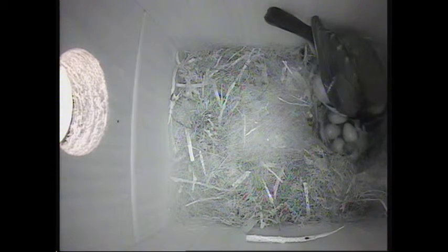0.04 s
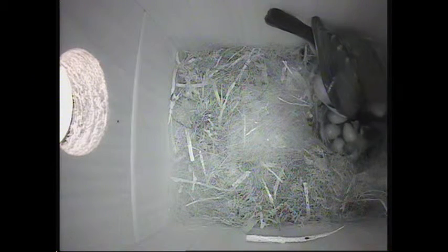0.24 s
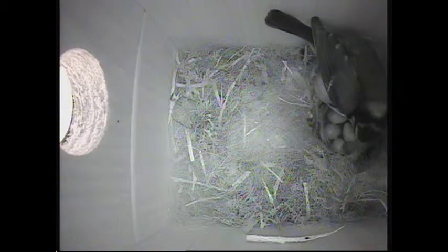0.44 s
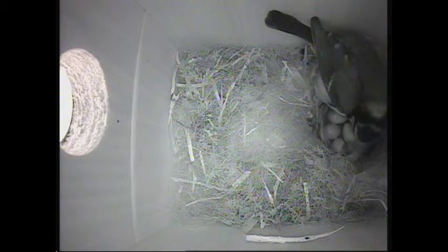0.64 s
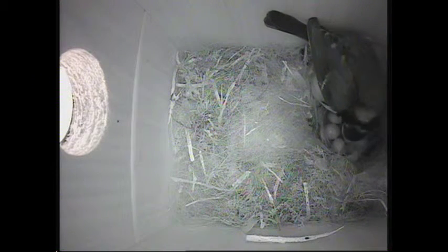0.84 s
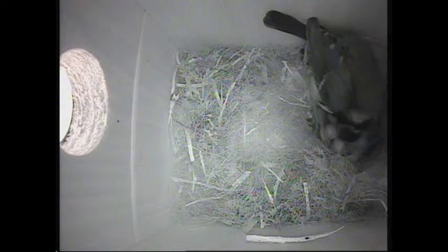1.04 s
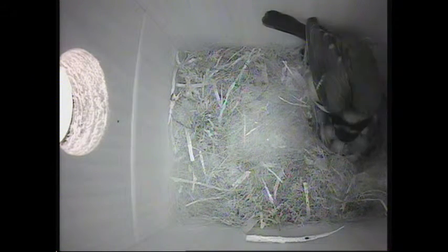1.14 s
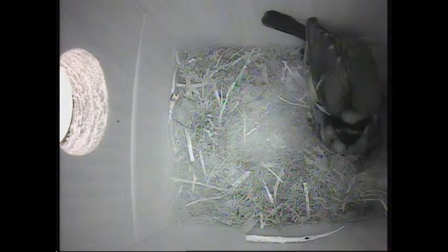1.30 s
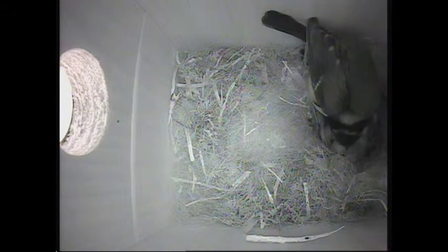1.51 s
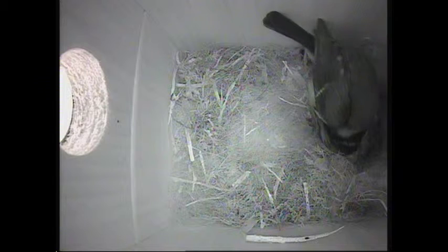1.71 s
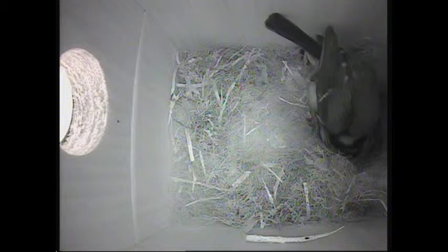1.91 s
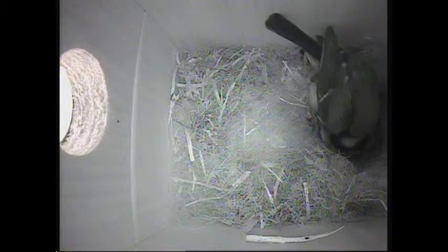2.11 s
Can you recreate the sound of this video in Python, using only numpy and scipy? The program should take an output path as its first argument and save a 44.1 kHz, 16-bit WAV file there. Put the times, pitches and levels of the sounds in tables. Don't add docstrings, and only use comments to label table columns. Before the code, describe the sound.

A tit scolds harshly inside a small wooden nest box: six short, dry, breathy rasps in quick succession from about 0.2 to 0.6 seconds, loud and close. Before it, a fluttering whistle falls and fades. From 0.6 seconds to the end, faint distant birds warble with thin metallic overtones. Constant low electrical buzz, rumble, hiss and slight bedding rustle lie underneath, almost entirely in the left channel.

```python
import sys
import numpy as np
from scipy import signal
from scipy.fft import rfft, irfft, next_fast_len
from scipy.io import wavfile
from scipy.ndimage import uniform_filter1d

SR = 44100
rng = np.random.default_rng(int(sys.argv[2]) if len(sys.argv) > 2 else 0)


def makeup_ratio(level_db):
    decades = np.asarray(level_db, float) / 20
    return 10 ** decades


def wav_record(signal):
    frames = np.transpose(np.atleast_2d(signal))
    bounded = np.clip(frames, -1, 1)
    quanta = np.round(bounded * 32767).astype(np.int16)
    wavfile.write(sys.argv[1], SR, quanta)


N = 94815
TIME_S = np.arange(N) / SR
LINE_HZ, FRAME_S = 15625, 1 / 50


def evened(x):
    return x / np.sqrt(np.mean(x ** 2) + 1e-20)


def coloured(x, points):
    f, db = np.transpose(points)
    hz = np.fft.rfftfreq(len(x), 1 / SR)
    gain = makeup_ratio(np.interp(np.log(hz + 1), np.log(f), db))
    return irfft(rfft(x) * gain, len(x))


def resonate(x, hz, width):
    turn = np.exp(2j * np.pi * np.cumsum(hz * np.ones(len(x))) / SR)
    r = np.exp(-np.pi * width / SR)
    return 2 * (turn * signal.lfilter([1 - r], [1, -r], x / turn)).real


def resonate_twice(x, hz, width, second_width):
    return resonate(resonate(x, hz, width), hz, second_width)


def wobble(count, span_s):
    span = max(int(span_s * SR), 2)
    smooth = uniform_filter1d(rng.standard_normal(count), span)
    return evened(uniform_filter1d(smooth, span))


def tone(hz):
    return np.sin(2 * np.pi * np.cumsum(hz) / SR)


def fader(points):
    return makeup_ratio(np.interp(TIME_S, *np.transpose(points)))


def echoed(x, t60, wet_db):
    t = np.arange(SR // 2) / SR
    tail = rng.standard_normal(len(t)) * makeup_ratio(-60 * t / t60)
    return x + makeup_ratio(wet_db) * signal.fftconvolve(x, tail / np.linalg.norm(tail))[:len(x)]


def add(mix, s, sound):
    part = mix[round(s * SR):][:len(sound)]
    part += sound[:len(part)]


# (frequency [Hz], density [dB per Hz])
HISS_COLOUR = [(120, -55), (200, -3), (371, -17), (446, -0.5), (842, -2), (1950, -11), (2750, -32),
               (12900, -36.5), (15500, -60)]


def hiss():
    return makeup_ratio(-56) * evened(coloured(rng.standard_normal(N), HISS_COLOUR))


# (time [s], level [dB])
RUMBLE_SWELL = [(0, -40.5), (.5, -38), (.8, -43), (.9, -38.5), (1.1, -39), (1.3, -34), (1.42, -41.5),
                (1.5, -37.5), (1.702, -43), (2.15, -39.5)]


def rumble():
    low = resonate_twice(rng.standard_normal(N), 128.4, 61.5, 61.5)
    return fader(RUMBLE_SWELL) * evened(low) + makeup_ratio(-69) * wobble(N, 0.014)


# (centre [Hz], width [Hz], level [dB])
FUZZY_WHINES = [(1960, 133, -55), (3800, 350, -64), (5854, 140, -66), (7820, 290, -68.5),
                (9770, 190, -74.5), (12630, 1300, -63.5)]


def whines():
    air = rng.standard_normal(N)
    bands = sum(makeup_ratio(db) * evened(resonate_twice(air, hz, width, 2 * width))
                for hz, width, db in FUZZY_WHINES)
    line = np.sqrt(2) * tone(LINE_HZ / 8 + 45 * wobble(N, .004))
    return bands + makeup_ratio(-62) * line


# (time [s], level [dB])
RUSTLE_SWELL = [(0, -48), (.1, -61.5), (.6, -52), (.9, -56), (1.102, -51), (1.3, -55.5), (1.6, -51),
                (1.75, -52), (1.85, -56.5), (2.15, -55)]


def rustle():
    ticks = rng.random(N) < 4000 / SR
    grains = ticks * rng.standard_normal(N) * makeup_ratio(1.5 * wobble(N, .015))
    return fader(RUSTLE_SWELL) * evened(coloured(grains, RASP_COLOUR))


# (place in the frame [s], height [full scale], rise [s], fall [s])
FRAME_KICKS = [
    (.0055, -0.024, 0.00011, .0003),
    (.0062, -0.091, 0.001, 0.003),
    (.0070, -.015, 0.00011, .0002),
    (0.0143, 0.042, 0.00032, 0.0025),
]


def buzz():
    out = np.zeros(N)
    for place, height, rise, fall in FRAME_KICKS:
        u = (TIME_S - place) % FRAME_S
        spread = makeup_ratio(1 * wobble(N, FRAME_S))
        out += height * spread * (np.exp(-u / fall) - np.exp(-u / rise))
    return out - out.mean()


def copied(x, copies_db):
    z = signal.hilbert(x, next_fast_len(N))[:N]
    out = np.zeros(N)
    for k, db in enumerate(copies_db):
        shift_hz = (k - 3) * LINE_HZ / 4
        out += makeup_ratio(db) * (z * np.exp(2j * np.pi * shift_hz * TIME_S)).real
    return out


# (start [s], length [s], from [Hz], to [Hz], level [dB])
SONG_NOTES = [(.052, 0.044, 3850, 4640, -55.5), (0.596, .028, 3800, 4580, -52),
              (0.646, .04, 3535, 4176, -57), (0.676, 0.034, 4100, 3640, -52),
              (0.747, 0.028, 4020, 3670, -59), (0.774, 0.057, 3714, 4250, -61),
              (0.933, 0.065, 4884, 4280, -52), (1.008, 0.046, 3820, 3824, -64.5),
              (1.052, .062, 4200, 4964, -57), (1.108, 0.0598, 5407, 6433, -53.5),
              (1.21, .06, 4304, 5820, -57), (1.242, 0.043, 4830, 4717, -55.5),
              (1.333, 0.043, 4400, 4700, -59), (1.404, 0.03, 4220, 4520, -55),
              (1.467, .088, 4250, 4950, -60), (1.545, 0.057, 5600, 6487, -55),
              (1.593, 0.034, 4960, 4440, -55.5), (1.657, 0.051, 4200, 5700, -57)]
SONG_COPIES = [-10, -9, -2, 0, 0, -10]
# (frequency [Hz], level [dB])
SONG_TINT = [(300, -10), (1500, -6), (2600, 3), (4500, 0), (6500, -5), (8500, 0), (10400, 1), (12500, -9)]


def song():
    fuzz_hz, haste, plateau, clear = 260, .8, 1.12, .9
    out, air, flutter = np.zeros(N), rng.standard_normal(N), wobble(N, 0.0036)
    for s, length, from_hz, to_hz, db in SONG_NOTES:
        u = np.linspace(0, 1, round(length * SR))
        at = round(s * SR) + np.arange(len(u))
        arch = .8 if to_hz > 5400 else .4
        slide = np.minimum(plateau * np.sin(np.pi * arch * u ** haste), 1)
        hz = from_hz + (to_hz - from_hz) * slide
        breath = evened(resonate_twice(air[at], hz, fuzz_hz, 2 * fuzz_hz))
        note = breath + clear * np.sqrt(2) * tone(hz)
        swell = abs(np.sin(np.pi * u)) ** .5
        add(out, s, makeup_ratio(db + 2 * flutter[at]) * swell * note)
    garden = echoed(out, .12, -6)
    return coloured(copied(garden, SONG_COPIES), SONG_TINT)


# (time [s], pitch [Hz], level [dB])
WHISTLE_PATH = [
    (0, 2650, -45.5),
    (0.049, 2532, -42.5),
    (0.084, 2374, -50),
    (.14, 2384, -55.5),
    (.21, 2360, -58),
]
WHISTLE_COPIES = [-23, -17.5, -6, 2.5, -7, -17]


def whistle():
    s, hz, db = np.transpose(WHISTLE_PATH)
    level = makeup_ratio(np.interp(TIME_S, s, db, right=-120) + 2.85 * wobble(N, 0.0022))
    pitch = np.interp(TIME_S, s, hz) + 40 * wobble(N, 0.0038)
    return copied(level * tone(pitch), WHISTLE_COPIES)


# (frequency [Hz], width [Hz], level [dB])
BOX_MODES = [(734, 167, -12), (1635, 103, 6), (2030, 237, -8), (2560, 69, -9), (3147, 93, -7),
             (3720, 180, -5.5), (4565, 95, -7.5), (5650, 38, -15), (7000, 125, -16.5), (7900, 320, -11),
             (8480, 163, -10), (10290, 170, -8.5), (12720, 200, -17), (14000, 1200, -18)]
# (frequency [Hz], density [dB per Hz])
RASP_COLOUR = [(24, -40), (40, -7), (361, -13.5), (710, -8), (1060, -21), (1620, -3.5), (5120, -11.5),
               (8650, -14.5), (15800, -24)]


def churr(length, effort_db, top, step_db):
    t = np.arange(4096) / SR
    db = np.interp(t / length, [0, top, .82, 1, 1.1], [step_db, 0, -9, -33.5, -90])
    snap = np.minimum(t / 0.0038, 1)
    ragged_db = 2.5 * wobble(len(t), .0006)
    drive = rng.standard_normal(len(t)) * makeup_ratio(ragged_db + db) * snap
    ring = np.zeros(len(t))
    for k, (hz, width, mode_db) in enumerate(BOX_MODES):
        level_chance, pitch_chance = rng.standard_normal(2)
        gain = (-1) ** k * makeup_ratio(mode_db + 1.5 * level_chance)
        ring += gain * resonate(drive, hz * (1 + .004 * pitch_chance), width)
    sound = evened(coloured(drive, RASP_COLOUR)) + makeup_ratio(2) * evened(ring)
    loudest = np.sqrt(uniform_filter1d(sound ** 2, size=600).max())
    return makeup_ratio(effort_db) * sound / loudest


# (start [s], length [s], effort [dB], place of the peak [0-1], opening step [dB])
SCOLDS = [
    (.219, 0.033, -9, 0.67, -13),
    (.272, 0.039, -11, 0.55, -0.5),
    (0.323, 0.041, -11.5, 0.44, -16.5),
    (0.386, 0.047, -12, 0.59, -5),
    (.454, 0.047, -9.5, 0.63, -7),
    (0.541, .054, -10, 0.58, -8.5),
]


def tit():
    out = np.zeros(N)
    for s, *row in SCOLDS:
        add(out, s, churr(*row))
    return echoed(out, 0.016, -10)


# (frequency [Hz], level [dB])
BACKGROUND_EDGE = [(14200, 0), (14900, -40)]


def scene():
    hum = buzz()
    background = hiss() + rumble() + whines() + rustle() + hum + song() + whistle()
    left = tit() + coloured(background, BACKGROUND_EDGE)
    right = makeup_ratio(-42) * hum + makeup_ratio(-96) * rng.standard_normal(N)
    return np.array([left, right])


# (frequency [Hz], level [dB])
CONVERTER_EDGE = [(15750, 0), (15950, -60)]


def converter(dry):
    return np.array([coloured(x, CONVERTER_EDGE) for x in np.clip(dry, -1, 1)])


def band_limit(x):
    return signal.sosfilt(signal.butter(12, 15920, fs=SR, output="sos"), x)


def record(dry):
    mix = converter(dry)
    return band_limit(mix)


dry = scene()
out = record(dry)
wav_record(out)
```